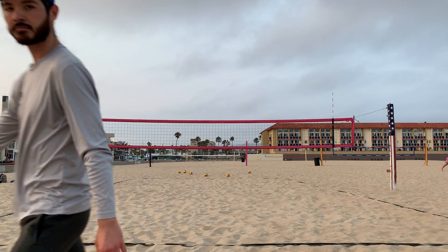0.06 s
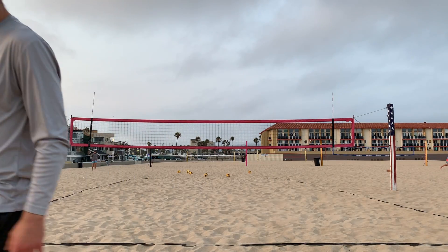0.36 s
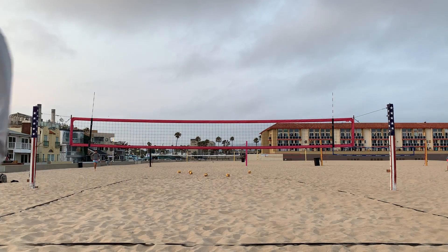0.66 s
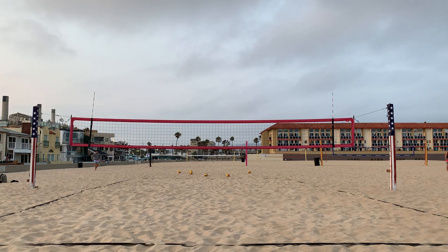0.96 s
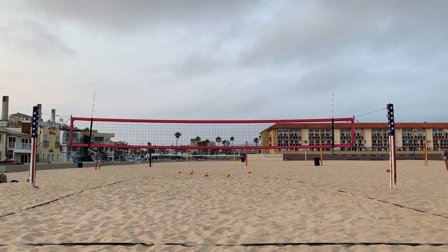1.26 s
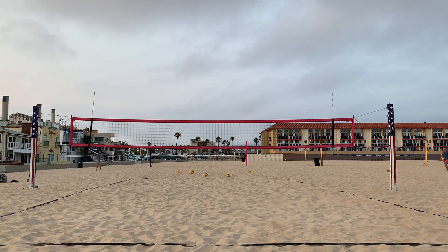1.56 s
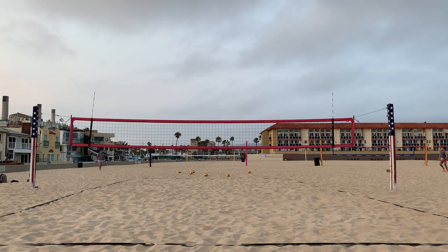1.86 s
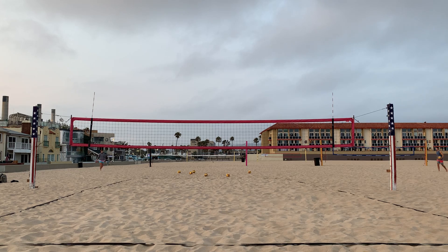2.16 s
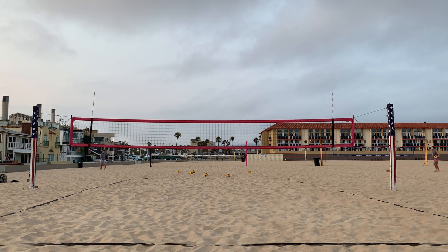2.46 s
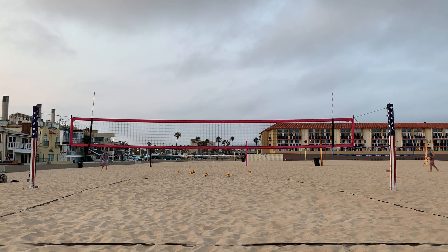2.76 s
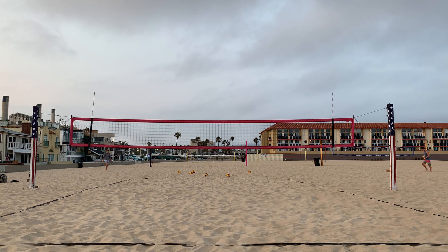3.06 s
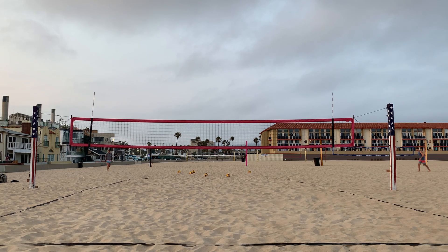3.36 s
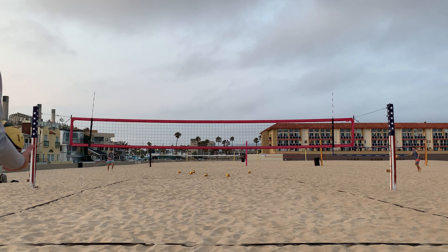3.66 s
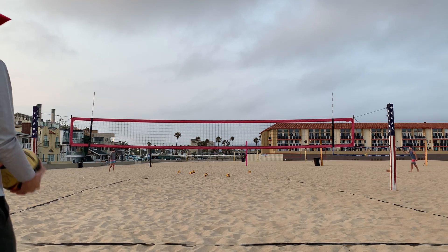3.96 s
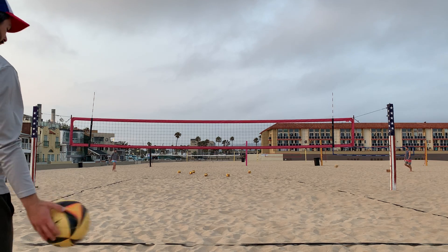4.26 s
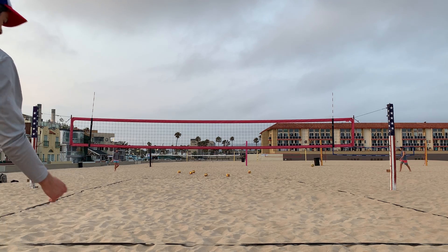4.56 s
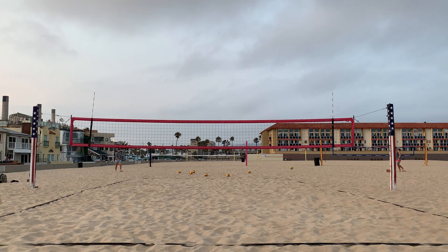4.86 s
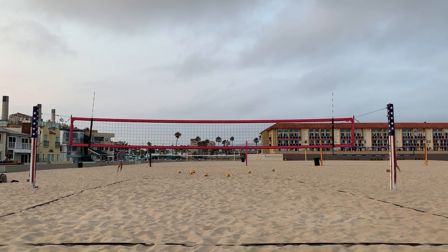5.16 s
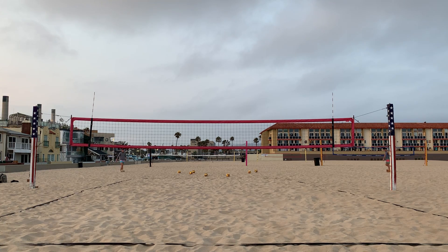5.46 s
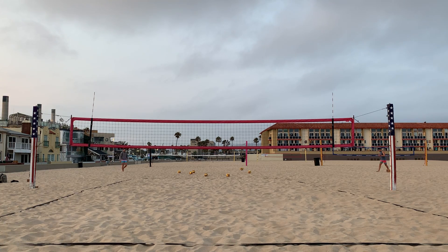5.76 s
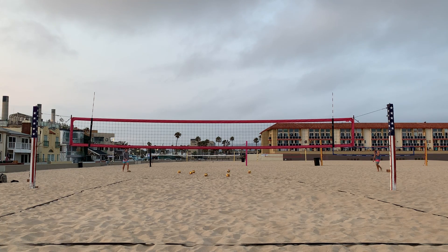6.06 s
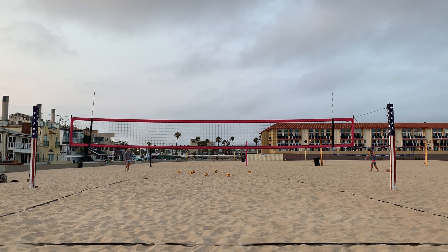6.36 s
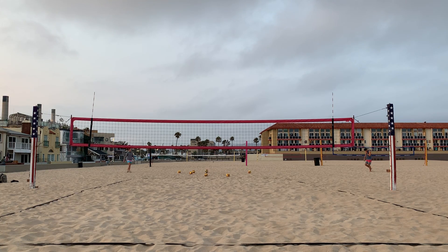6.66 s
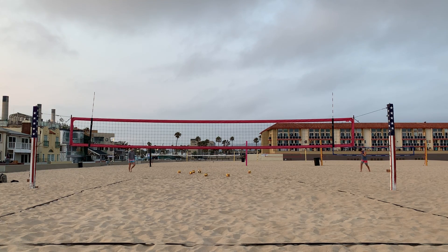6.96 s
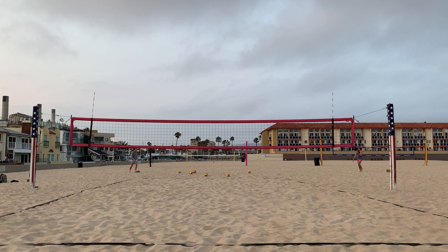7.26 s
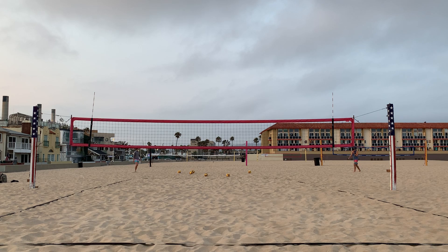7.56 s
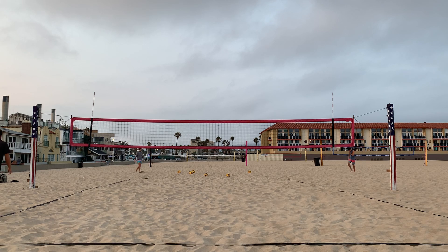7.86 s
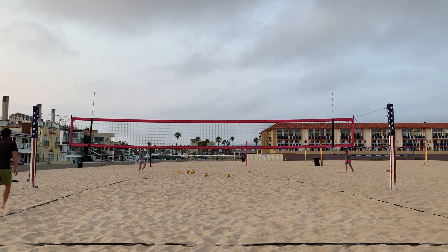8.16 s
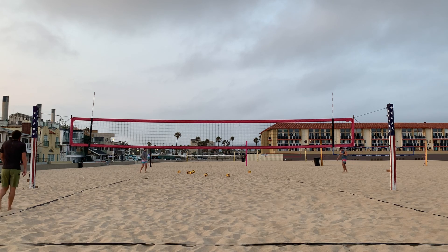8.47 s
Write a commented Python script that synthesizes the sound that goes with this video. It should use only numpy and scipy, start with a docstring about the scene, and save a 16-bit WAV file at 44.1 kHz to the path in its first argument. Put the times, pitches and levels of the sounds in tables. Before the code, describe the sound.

A volleyball is lightly patted and twice struck hard by hand, with faint sand scuffs and distant surf and town rumbling behind.

```python
"""A few soft pats and two hard hand strikes on a volleyball, close by on the left, on a beach.
Each touch squeezes a burst of air from under the hand; the ball dents and springs back, and a hard
strike also rings the air inside it. Feet push into the sand and flick grains about.
Behind are faint gull cries, a far engine, waves hissing up the shore and a rumble of surf and town."""
import sys
import numpy as np
from scipy import signal
from scipy.fft import rfft, irfft
from scipy.io import wavfile
from scipy.ndimage import uniform_filter1d

SR = 44100
rng = np.random.default_rng(int(sys.argv[2]) if len(sys.argv) > 2 else 0)


def log_audio(samples):
    """Write samples as a 16-bit WAV file to the path given in sys.argv[1]."""
    # one column per channel
    frames = np.atleast_2d(samples).T
    # limit to full scale, then quantise
    limited = np.clip(frames, -1, 1)
    pcm = np.round(limited * 32767).astype(np.int16)
    wavfile.write(sys.argv[1], SR, pcm)


N = 383669
TIME = np.arange(N) / SR
AHEAD, LEFT = 0, 1
DENT_AFTER_S, REBOUND_AFTER_S = .0022, .0069  # from the first contact
DENT_SAG = .89  # the dent's pitch glides toward this share of its start


def hard_strikes(mix):
    """Impact: the palm lands, the ball dents, the heel of the hand lands, the ball springs back."""
    # hard blows: start_s, palm_db, pocket_hz, pocket_boost_db, pocket_width_octaves, crack_boost_db,
    # echo_delay_s, echo_db, heel_db, push_db, dent_db, dent_hz, rebound_db, free_ring_share
    strikes = [(2.1055, 14, 2550, 4, .3, 4, .0049, -5, 7, -3.5, -12, 430, -8.5, 0.8),
               (7.5604, 11.5, 4000, 12, 0.3, -6, .0058, -21, -1, -18, -6.5, 263.3, -7.5, 0.2)]
    heel_after_s, push_after_s, dent_cycles = .0026, .0033, 1.4
    for (start, palm_db, pocket_hz, pocket_db, pocket_octaves, crack_db, echo_s, echo_db,
         heel_db, push_db, dent_db, dent_hz, rebound_db, free_share) in strikes:
        air_pocket, skin_crack = (pocket_hz, pocket_db, pocket_octaves), (6460, crack_db, .23)
        palm = slap(palm_db, decay_s=.00065, peaks=[air_pocket, skin_crack], dull_hz=15000, side=LEFT)
        for at, sound in (start, palm), push(start + push_after_s, push_db):
            add(mix, at, sound)
            add(mix, at + echo_s, gain_of(echo_db) * sound)  # ground reflection
        dent_s = dent_cycles / dent_hz
        dent = thump(dent_db, dent_hz, DENT_SAG * dent_hz, glide_s=dent_s, length_s=dent_s, side=LEFT)
        heel = slap(heel_db, decay_s=.0012, peaks=[(2198, 9.5, .34)], dull_hz=2622, side=LEFT)
        rebound = thump(rebound_db, first_hz=216, last_hz=42.3, glide_s=.0086, length_s=.013,
                        side=LEFT, wobble_lengths=7.5 * free_share)
        add(mix, start + DENT_AFTER_S, dent)
        add(mix, start + DENT_AFTER_S, cavity_ring(free_share))
        add(mix, start + heel_after_s, heel)
        add(mix, start + REBOUND_AFTER_S, rebound)


def soft_pats(mix):
    """Weak impact: a hollow pock, a tick of skin, a dent and a slow rebound, too soft to ring the ball."""
    # soft touches: start_s, pock_db, pock_hz, pock_boost_db, dull_hz, tick_db, contact_decay_s,
    # dent_db, dent_hz, rebound_db, side (0 ahead, 1 left)
    pats = [(.8582, -16, 800, 11, 1200, -13, 0.0016, -36.5, 270, -34.5, 1),
            (3.6562, -12, 900, 16.5, 1080, -11, 0.004, -35, 438, -38, 1),
            (4.498, -34.5, 890, 5.5, 900, -53, 0.0032, -40, 280, -36, 0),
            (4.6898, -1, 850, 5, 1500, -26, .0016, -27, 240, -23, 0)]
    for (start, pock_db, pock_hz, boost_db, dull_hz, tick_db, decay_s,
         dent_db, dent_hz, rebound_db, side) in pats:
        pock = slap(pock_db, decay_s, peaks=[(pock_hz, boost_db, .23)], dull_hz=dull_hz, side=AHEAD)
        tick = slap(tick_db, decay_s, peaks=[(4730, 4.5, .22)], dull_hz=10800, side=LEFT)
        dent = thump(dent_db, dent_hz, DENT_SAG * dent_hz, glide_s=.0094, length_s=.0094, side=side)
        rebound = thump(rebound_db, first_hz=165, last_hz=59, glide_s=.011, length_s=.029, side=side)
        add(mix, start, pock)
        add(mix, start + decay_s / 2, tick)
        add(mix, start + DENT_AFTER_S, dent)
        add(mix, start + REBOUND_AFTER_S, rebound)


def slap(db, decay_s, peaks, dull_hz, side):
    """Air expelled under the hand, with peaks (centre_hz, boost_db, octaves), scatters off the sand."""
    # spectrum of a hand on the ball: frequency_hz, density_db
    slap_spectrum = [(100, -16), (520, 4), (780, 1.5), (1200, 7), (1600, -1), (3100, 0), (4600, -5),
                     (5500, -4), (6500, -3.5), (7800, -16), (9200, -5), (10500, -2.5), (12800, -12.5),
                     (14500, -3), (16000, -4)]
    scatter_db, scatter_decay_s, scatter_hz, treble_floor_db = -12, .0075, 4500, -24
    t, hz = np.arange(4096) / SR, np.fft.rfftfreq(4096, 1 / SR)
    burst_noise, scatter_noise = rng.standard_normal((2, len(t)))
    burst = rfft(t / decay_s * np.exp(-2 * t / decay_s) * burst_noise)
    burst /= np.sqrt(uniform_filter1d(abs(burst) ** 2, size=70))  # flat before the peaks shape it
    peaks_db = sum(boost * bell(np.log2((hz + 1) / centre) / octaves) for centre, boost, octaves in peaks)
    burst *= minimum_phase(peaks_db)
    scatter = unit_rms(rfft(scatter_noise * np.exp(-t / scatter_decay_s)))
    scatter *= gain_of(scatter_db) / (1 + 1j * hz / scatter_hz)
    # a soft touch loses treble
    softness_db = 10 * np.log10(1 / (1 + (hz / dull_hz) ** 4) + gain_of(treble_floor_db) ** 2)
    colour = gain_of(db) * minimum_phase(curve_at(slap_spectrum, hz) + softness_db)
    return arrive(burst * colour, hz, side) + arrive(scatter * colour, hz, AHEAD)


def push(crest_s, db, width_s=.00044, spread=2.9):
    """Acceleration noise of the driven ball: a pressure crest inside a wider, shallow suction."""
    t = np.arange(-.02, .06, 1 / SR)
    pulse = gain_of(db) * (bell(t / width_s) - bell(t / (spread * width_s)) / spread)
    return crest_s + t[0], arrive(rfft(pulse), np.fft.rfftfreq(len(t), 1 / SR), LEFT)


def thump(db, first_hz, last_hz, glide_s, length_s, side, wobble_lengths=2.8):
    """Damped oscillation after a blow: a brief swing of falling pitch, then a faint wobble."""
    rise_s, wobble_db = .0023, -19
    t = np.arange(SR // 5) / SR
    pitch_hz = last_hz + (first_hz - last_hz) * np.exp(-t / glide_s)
    wobble = gain_of(wobble_db) * np.exp(-t / (wobble_lengths * length_s))
    envelope = (1 - np.exp(-t / rise_s)) * (np.exp(-(t / length_s) ** 4) + wobble)
    pressure = gain_of(db) * envelope * np.sin(2 * np.pi * np.cumsum(pitch_hz) / SR)
    return arrive(rfft(pressure), np.fft.rfftfreq(len(t), 1 / SR), side)


def cavity_ring(free_share, db=-33, right_lag_s=.00037):
    """Cavity resonance: the air in the ball pings; the hand damps it to a share of its free ring time."""
    # modes of the enclosed air: pitch_hz, level_db, free_t60_s
    modes = [(1220, 2.5, 0.1), (1550, -1, .035), (1890, 7.5, 0.1), (2150, 7, 0.049), (2315, -4.5, 0.36),
             (3220, -11, 0.21), (4450, -6.5, .07)]
    t = np.maximum(np.arange(SR // 2) / SR - np.array([[0], [right_lag_s]]), 0)
    return sum(gain_of(db + mode_db - 60 * t / (t60 * free_share)) * np.sin(2 * np.pi * hz * t)
               for hz, mode_db, t60 in modes)


def footwork(mix):
    """Granular friction and impact: feet sink in, flicked sand lands, the player comes down with a thud."""
    # feet pushing into sand: start_s, level_db, settling_s, tilt_db_per_octave
    steps = [(.53, -68, .025, 1.5), (.865, -67, 0.041, 3), (.985, -57.5, 0.05, -2.5),
             (1.91, -72.5, 0.049, 5), (2.19, -66, 0.073, 7), (2.28, -56, 0.053, -3),
             (3.68, -63.5, 0.052, 4), (3.82, -70.5, 0.058, 6), (5.83, -69.5, 0.068, 3),
             (6.33, -75.5, 0.12, 9), (6.44, -65, .035, 3), (6.52, -68, 0.059, 2), (7.70, -53.5, 0.028, -1),
             (7.74, -52, 0.07, -2.5)]
    # pinches of loose sand landing: start_s, level_db, decay_s, tilt_db_per_octave
    flicks = [(.964, -60, .003, 0), (1.005, -58, .005, -8), (1.023, -56, .002, -1.5),
              (2.179, -46.5, 0.0026, 3), (2.186, -52, 0.0096, 11.5), (3.706, -65, 0.0037, 16),
              (4.21, -67, .01, 13), (4.372, -71, 0.0093, 14.5), (4.872, -62, 0.0095, 8),
              (6.445, -59.5, 0.044, 11), (7.623, -47, 0.0032, 7), (7.631, -49, 0.011, -5.5),
              (7.661, -55, .002, 8), (7.6727, -43.5, 0.0025, 5.5), (7.679, -53, 0.0099, 3),
              (7.726, -44, 0.008, -2), (7.750, -44, 0.0026, 0), (7.779, -54, 0.0024, -1)]
    step_rise_share, flick_rise_s, landing_s = .43, .00086, 7.674
    for start, db, settling_s, tilt_db in steps:
        add(mix, start, sand_spray(db, step_rise_share * settling_s, settling_s, tilt_db, grain_db=5))
    for start, db, decay_s, tilt_db in flicks:
        add(mix, start, sand_spray(db, flick_rise_s, decay_s, tilt_db, grain_db=3.5))
    add(mix, landing_s, thump(db=-41, first_hz=110, last_hz=85, glide_s=.035, length_s=.035, side=LEFT))


def sand_spray(db, rise_s, decay_s, tilt_db, grain_db, clump_db=.5):
    """Random collisions of uneven grains sum to a noise that swells and settles, mostly on the left."""
    # spectrum of moving sand: frequency_hz, density_db
    sand_spectrum = [(200, -21), (700, -1.5), (2000, -1), (2900, 2), (4100, -3.5), (6400, -8.5),
                     (7800, -23), (9500, -13), (12500, -26), (15000, -19), (16500, -25.5)]
    n = 2 * (SR // 3)
    t, hz = np.arange(n) / SR, np.fft.rfftfreq(n, 1 / SR)
    grains = rng.standard_normal((2, n))
    grains *= gain_of(grain_db * np.minimum(rng.exponential(1, (2, n)), 5))  # a few large among many small
    grains *= gain_of(clump_db * smooth_noise(n, span=180))
    left, ahead = rfft(grains) * gain_of(curve_at(sand_spectrum, hz) + tilt_db * np.log2((hz + 1) / 4000))
    envelope = np.minimum(t / rise_s, 1) * np.exp(-np.maximum(t - rise_s, 0) / decay_s)
    return gain_of(db) * envelope * unit_rms(arrive(left, hz, LEFT) + .15 * arrive(ahead, hz, AHEAD))


def gull_series(mix):
    """Periodic calling: the cries arch in pitch, and come slower and fainter once the gull tires."""
    call_s, gap_s, tires_s, tired_gap_s = .085, .328, 2.3, .355
    fresh_db, fade_db_per_s = -74, 6
    highest_hz, highest_s, bow_hz_per_s2 = 1502, 1.8, 24.8
    for _ in range(11):
        tired_s = max(call_s - tires_s, 0)
        top_hz = highest_hz - bow_hz_per_s2 * (call_s - highest_s) ** 2
        add(mix, *gull_cry(call_s, top_hz, fresh_db - fade_db_per_s * tired_s))
        call_s += tired_gap_s if tired_s else gap_s


def gull_cry(top_s, top_hz, db):
    """A rough harmonic voice climbs, then drops steeply, brightest at the top; the houses reflect it."""
    # partials of the gull's throat: harmonic_number, level_db
    partials = [(2, -1.5), (3, -3), (4, -11)]
    climb_s, fall_s, climb_share, fall_share, waver_share = .095, .05, .14, .27, .013
    dulling_db, flutter_db, echo_s, echo_db = 9, 3, .075, -6
    t = np.arange(-climb_s * rng.uniform(.85, 1.1), fall_s, 1 / SR)
    off_top = (t / np.where(t < 0, climb_s, fall_s)) ** 2
    droop = np.where(t < 0, climb_share, fall_share) * off_top
    pitch_hz = top_hz * (1 - droop + waver_share * smooth_noise(len(t), span=100))
    phase = 2 * np.pi * np.cumsum(pitch_hz) / SR
    cry = np.zeros(len(t))
    for k, partial_db in partials:
        level_db = db + partial_db + rng.standard_normal() - dulling_db * (k - 2) * off_top
        cry += gain_of(level_db) * np.sin(k * phase)
    cry *= gain_of(flutter_db * smooth_noise(len(t), span=700))  # the breeze breaks it up
    cry *= signal.windows.tukey(len(t), .2)
    delay = round(echo_s * SR)
    return max(top_s + t[0], 0), np.pad(cry, (0, delay)) + gain_of(echo_db) * np.pad(cry, (delay, 0))


def engine(width_hz=11):
    """Random modulation blurs a far engine's low note, which rises and grows louder near the end."""
    # course of the drone: time_s, pitch_hz, level_db
    course = [(0, 103.5, -54), (5.4, 102.4, -60.5), (6.3, 105.5, -47.5), (7.1, 110.4, -52.5),
              (8.1, 121.6, -49), (8.7, 121.1, -44.5)]
    times, pitch_hz, level_db = np.transpose(course)
    offset_hz = np.fft.fftfreq(N, 1 / SR)
    sidebands = bell(offset_hz / width_hz) * (1 + np.sign(offset_hz) / 2)  # stronger above the note
    drift = np.fft.ifft(np.fft.fft(rng.standard_normal(N)) * sidebands)
    phase = 2 * np.pi * np.cumsum(np.interp(TIME, times, pitch_hz)) / SR
    return gain_of(np.interp(TIME, times, level_db)) * unit_rms((drift * np.exp(1j * phase)).real)


def waves():
    """Incoherent sources add in power: each wave swells, breaks on the sand and leaves a long backwash."""
    # waves running up the sand: crest_s, level_db
    crests = [(5.15, -69.5), (5.85, -70.5)]
    # spectrum of their hiss: frequency_hz, density_db
    hiss_spectrum = [(300, -11.5), (900, -10.5), (2000, 2.5), (3200, 2), (4500, -5.5), (6500, -17),
                     (9000, -26.5), (16000, -30.5)]
    rise_s, break_s, backwash_share, drain_db_per_s = .27, .47, .85, 2.5
    power = gain_of(-74.5 - drain_db_per_s * TIME) ** 2  # an earlier wave is still draining
    for crest_s, db in crests:
        before, after = np.maximum(crest_s - TIME, 0), np.maximum(TIME - crest_s, 0)
        breaking = (1 - backwash_share) * np.exp(-after / break_s)
        backwash = backwash_share * gain_of(-drain_db_per_s * after)
        power += (gain_of(db) * bell(before / rise_s) * (breaking + backwash)) ** 2
    return np.sqrt(power) * diffuse(hiss_spectrum, patchy_db=2)


def swish(peak_s=5.22, rise_s=.072, fall_s=.029, db=-66):
    """Band-limited noise: a narrow hiss swells and stops on top of the first wave."""
    # spectrum of the swish: frequency_hz, density_db
    swish_spectrum = [(1000, -34), (2300, -5.5), (2850, 4), (3600, 1.5), (4400, -20), (7000, -31)]
    width_s = np.where(TIME < peak_s, rise_s, fall_s)
    return gain_of(db) * bell((TIME - peak_s) / width_s) * diffuse(swish_spectrum, patchy_db=1.5)


def surf_and_town(wash_db=-59):
    """Many distant sources merge into diffuse noise: a low rumble and the steady wash of far surf."""
    # spectrum of the rumble: frequency_hz, density_db
    rumble_spectrum = [(20, -28.5), (32, -28), (45, -14), (58, 6), (85, 1), (120, -4), (170, -4.5),
                       (215, -10.5), (270, -19.5), (400, -29.5), (900, -40.5), (3000, -83.5)]
    # slow swell of the rumble: time_s, level_db
    rumble_levels = [(0, -46), (4.5, -46), (5.4, -46.5), (6.2, -43), (6.9, -47), (7.9, -45)]
    # spectrum of the far surf: frequency_hz, density_db
    wash_spectrum = [(100, -6), (330, -3.5), (540, 0.5), (780, -0.5), (1100, -8.5), (1600, -11.5),
                     (2600, -17), (4000, -30.5), (6000, -33.5), (8500, -37.5), (10500, -34.5),
                     (13000, -39.5), (15300, -40.5), (16500, -52.5)]
    swell = gain_of(np.interp(TIME, *np.transpose(rumble_levels)))
    rumble = swell * diffuse(rumble_spectrum, patchy_db=1)
    return rumble + gain_of(wash_db) * diffuse(wash_spectrum, patchy_db=1.27)


def diffuse(spectrum, patchy_db):
    """A diffuse field: noise from all around in drifting patches, wide in the mids, near mono in the bass."""
    # left-right likeness, limited below to +-1: frequency_hz, correlation
    likeness = [(60, 1), (130, 0.76), (290, 0.9), (640, 0.24), (1410, -0.36), (3100, -0.1), (7000, 0.26),
                (8500, -1.3), (10800, 0.54), (13300, -0.4), (15000, .6)]
    hz = np.fft.rfftfreq(2048, 1 / SR)
    mid_re, mid_im, side_re, side_im, patches = rng.standard_normal((5, len(hz), N // 512 + 5))
    patches = uniform_filter1d(patches, size=24, axis=0)  # smooth over frequency
    patches = unit_rms(uniform_filter1d(patches, size=8, axis=1))  # and over time
    correlation = np.clip(curve_at(likeness, hz), -1, 1)[:, None]
    frames = np.array([(mid_re + 1j * mid_im) * np.sqrt(1 + correlation),
                       (side_re + 1j * side_im) * np.sqrt(1 - correlation)])
    frames *= gain_of(curve_at(spectrum, hz)[:, None] + patchy_db * patches)
    mid, side = signal.istft(frames, nperseg=2048, noverlap=1536)[1][:, :N]
    return np.array([mid + side, mid - side]) / np.std(mid)


def arrive(spectrum, hz, side, travel_s=.00021):
    """Path difference turns a spectrum into stereo: sound from the left reaches the right channel late."""
    # lag of the right channel: frequency_hz, phase_rad
    right_lag = [(0, 0.04), (290, 1.56), (500, 1.93), (780, 2.4), (1500, 4), (2000, 5.5), (2500, 8.5),
                 (3000, 9.5), (3500, 10.4), (4400, 12), (5600, 16.5), (6600, 18), (8500, 15.5),
                 (15400, 7.5)]
    lag = np.interp(hz, *np.transpose(right_lag)) * side
    pair = irfft(np.array([spectrum, spectrum * np.exp(-1j * lag)]) * np.exp(-2j * np.pi * hz * travel_s))
    return pair * np.minimum(np.linspace(2, 0, pair.shape[1]), 1) ** 2  # the tail fades to nothing


def minimum_phase(db):
    """The causal response of a dB spectrum: nothing sounds before the blow."""
    log_gain = np.log(gain_of(np.concatenate([db, db[-2:0:-1]])))
    return np.exp(np.conj(signal.hilbert(log_gain)))[:len(db)]


def curve_at(points, hz):
    """A curve's value at hz, interpolated on a log-frequency axis."""
    point_hz, value = np.transpose(points)
    return np.interp(np.log(hz + 1), np.log(point_hz + 1), value)


def smooth_noise(n, span):
    return unit_rms(uniform_filter1d(rng.standard_normal(n), size=span))


def bell(x):
    return np.exp(-.5 * x ** 2)


def gain_of(db):
    return 10 ** (np.asarray(db) / 20)


def unit_rms(x):
    return x / np.sqrt(np.mean(abs(x) ** 2) + 1e-20)


def add(mix, start_s, sound):
    part = mix[:, round(start_s * SR):][:, :sound.shape[-1]]
    part += sound[..., :part.shape[1]]


def scene():
    """Superposition: ball, sand and gull add to the open-air background."""
    mix = surf_and_town() + waves() + swish() + engine()
    hard_strikes(mix)
    soft_pats(mix)
    footwork(mix)
    gull_series(mix)
    return mix


def record(dry, edge_hz=16200):
    """Frequency response: each channel takes its own colour, clips at full scale and is band-limited."""
    # channel balance: frequency_hz, left_minus_right_db
    balance = [(60, -5), (120, -3.5), (200, -2.5), (380, 0.3), (700, 2.5), (1300, 0), (2400, 0),
               (4400, -2.5), (6000, -4), (9000, 0)]
    lean_db = curve_at(balance, np.fft.rfftfreq(N, 1 / SR)) / 2
    coloured = irfft(rfft(dry) * gain_of([lean_db, -lean_db]), N)
    low_pass = signal.firwin(255, edge_hz, window=("kaiser", 9), fs=SR)
    return signal.oaconvolve(np.clip(coloured, -1, 1), low_pass[None], "same", axes=1)


dry = scene()
out = record(dry)
log_audio(out)
```